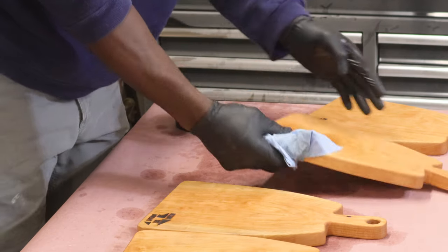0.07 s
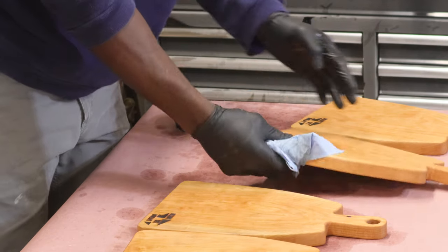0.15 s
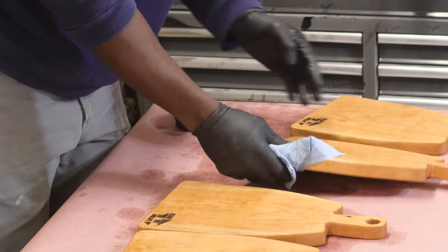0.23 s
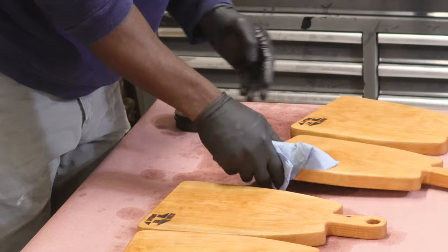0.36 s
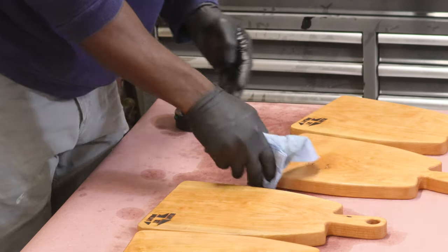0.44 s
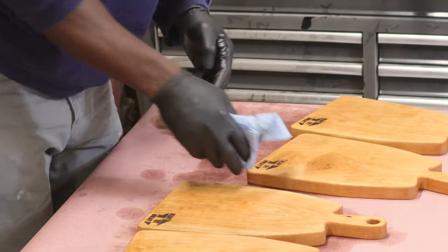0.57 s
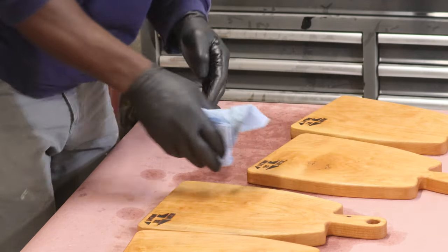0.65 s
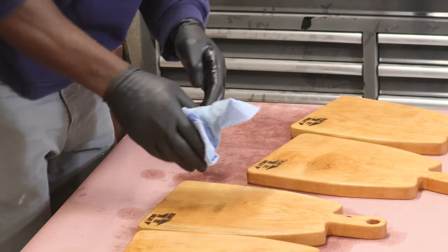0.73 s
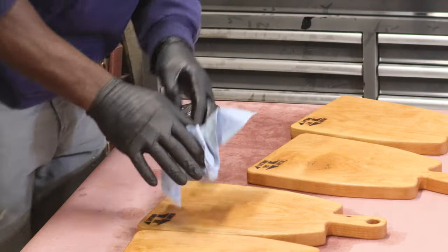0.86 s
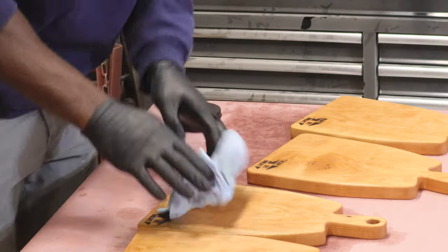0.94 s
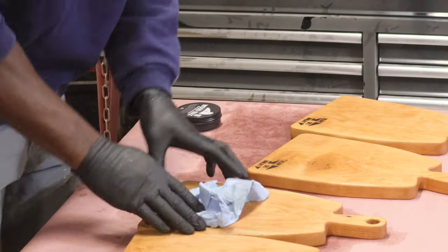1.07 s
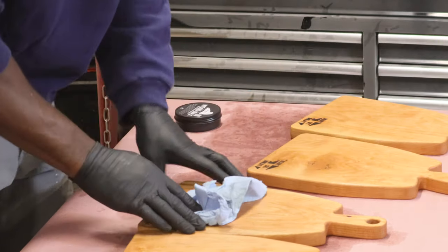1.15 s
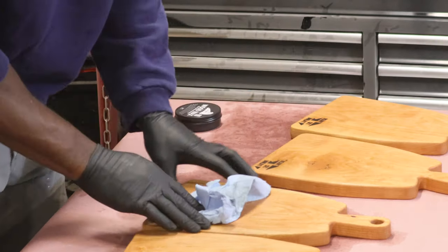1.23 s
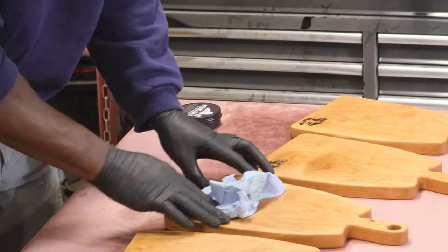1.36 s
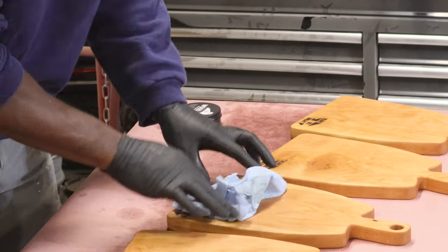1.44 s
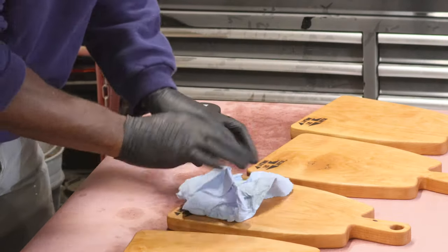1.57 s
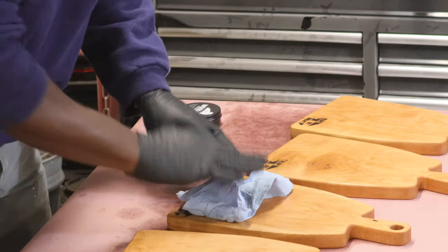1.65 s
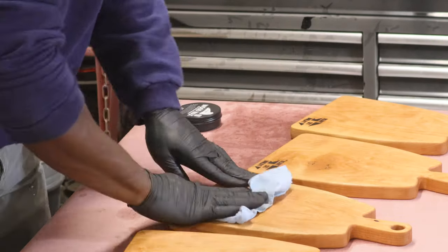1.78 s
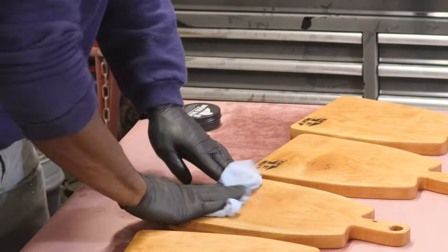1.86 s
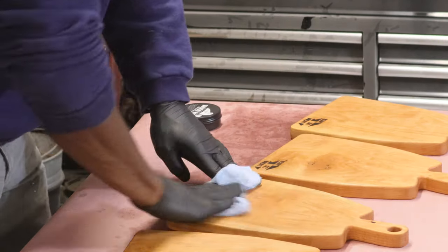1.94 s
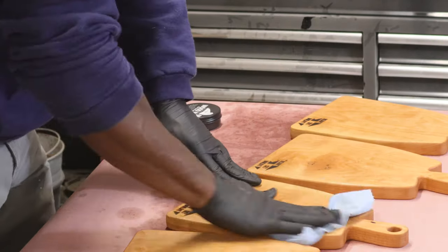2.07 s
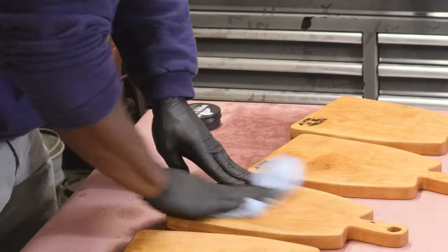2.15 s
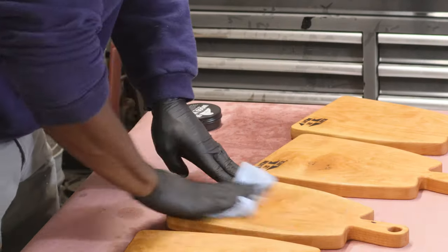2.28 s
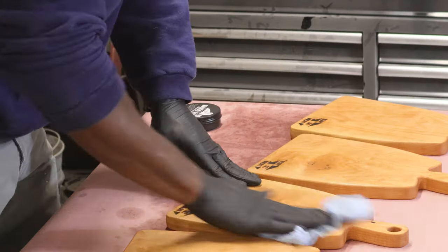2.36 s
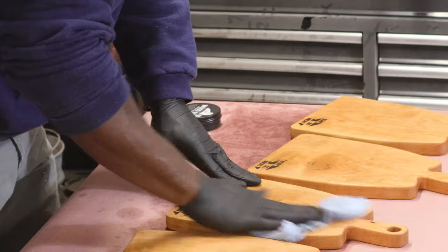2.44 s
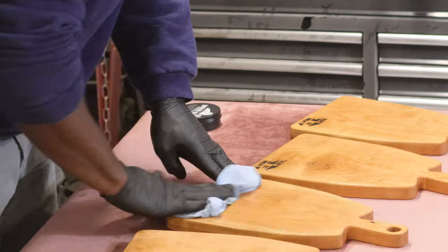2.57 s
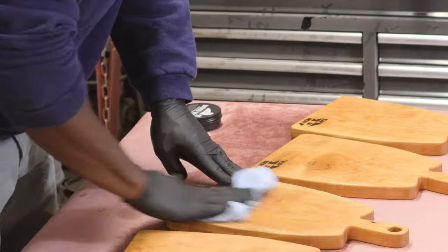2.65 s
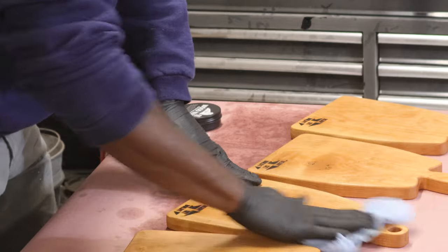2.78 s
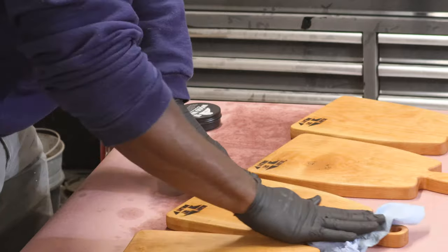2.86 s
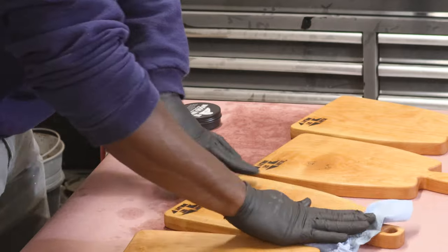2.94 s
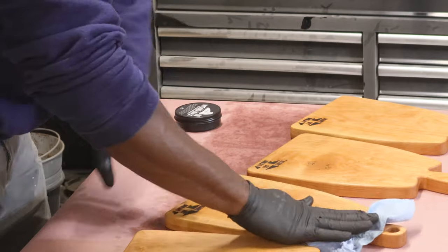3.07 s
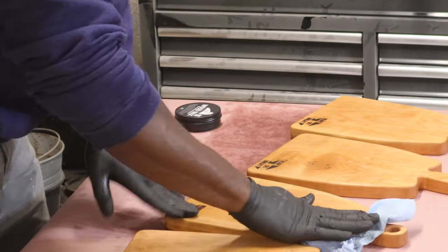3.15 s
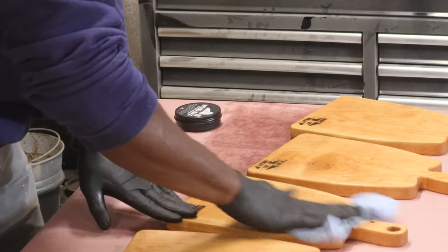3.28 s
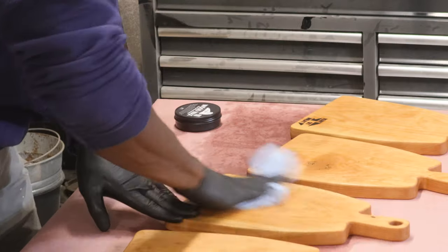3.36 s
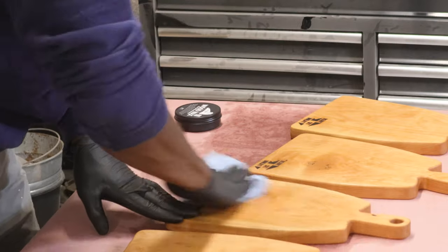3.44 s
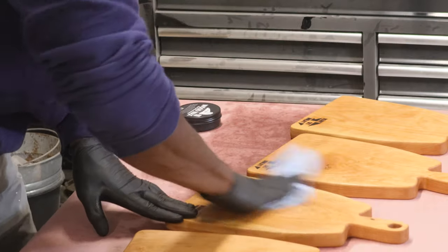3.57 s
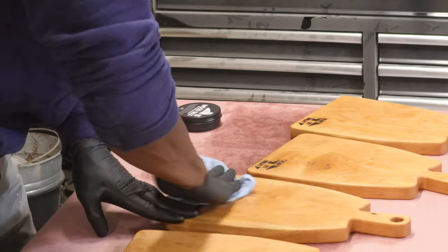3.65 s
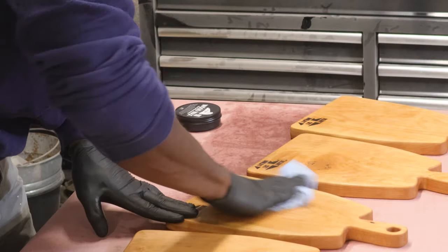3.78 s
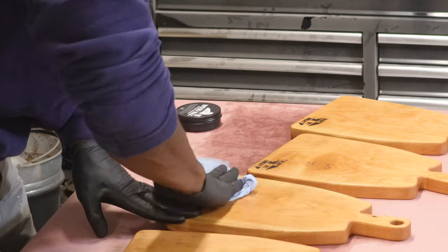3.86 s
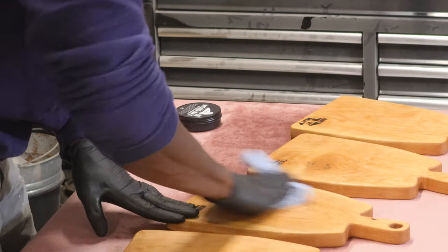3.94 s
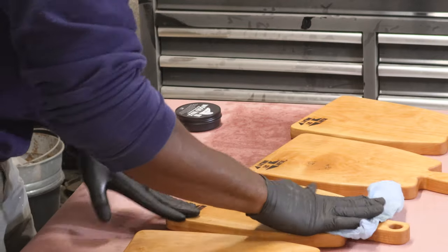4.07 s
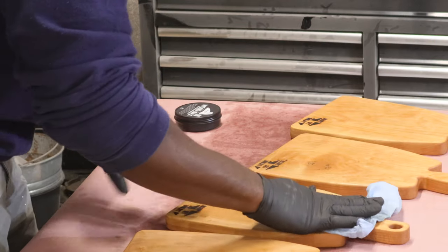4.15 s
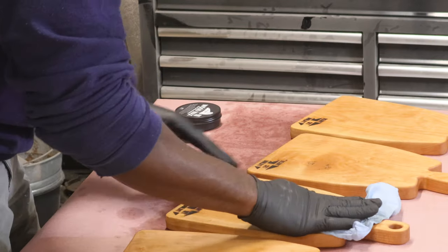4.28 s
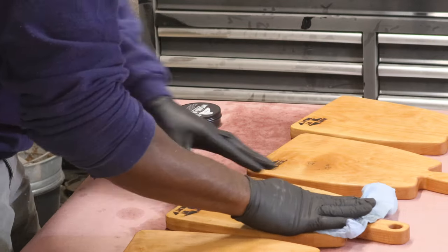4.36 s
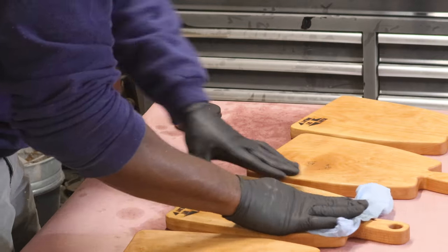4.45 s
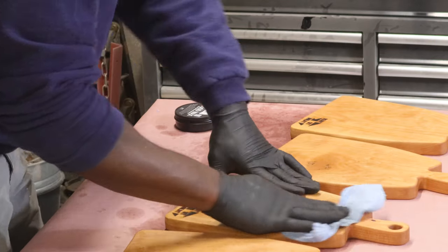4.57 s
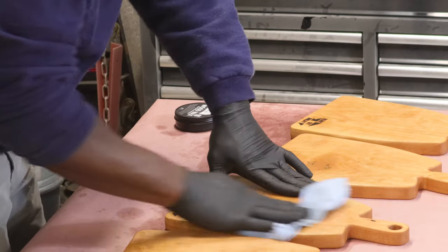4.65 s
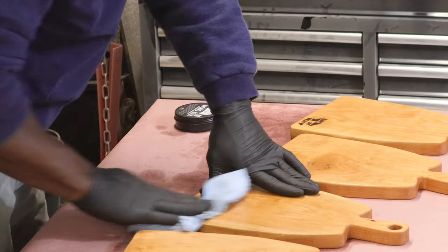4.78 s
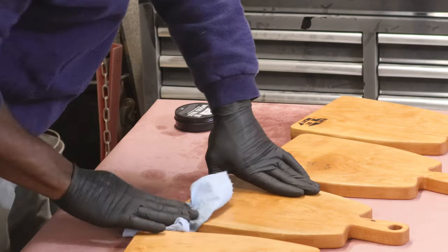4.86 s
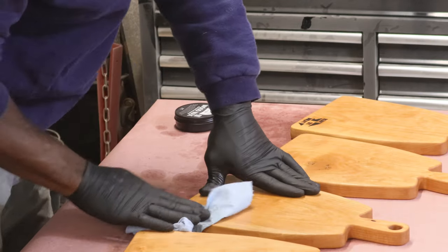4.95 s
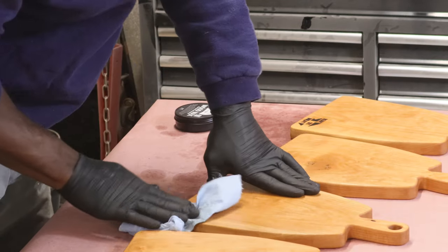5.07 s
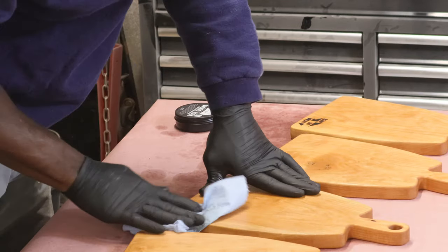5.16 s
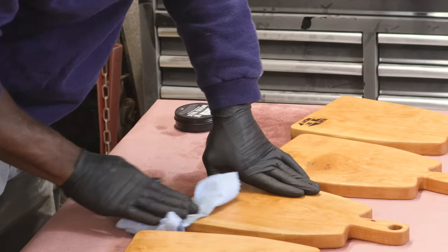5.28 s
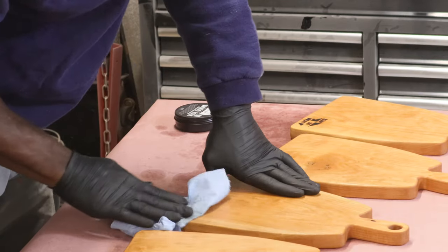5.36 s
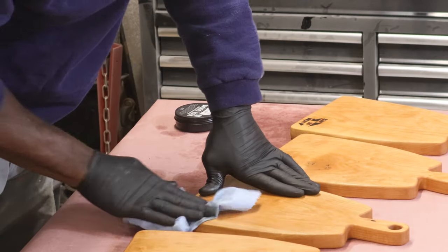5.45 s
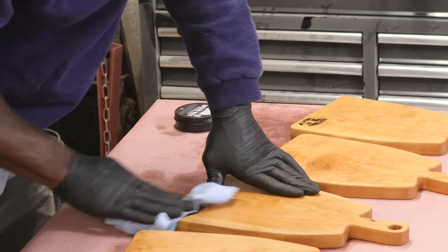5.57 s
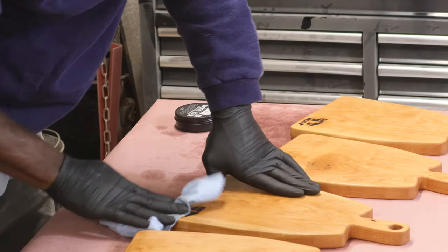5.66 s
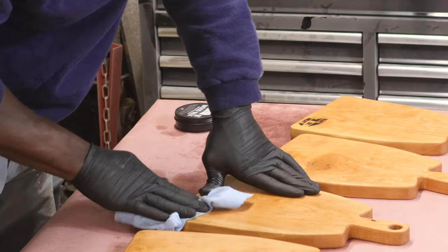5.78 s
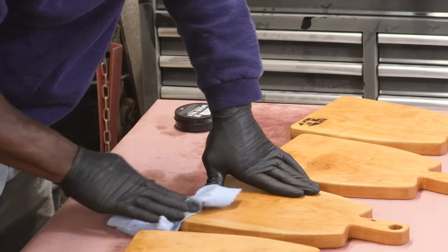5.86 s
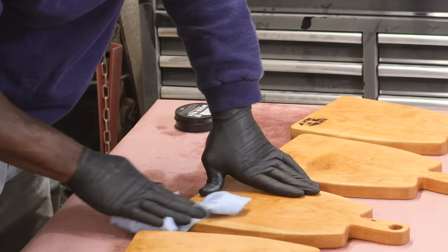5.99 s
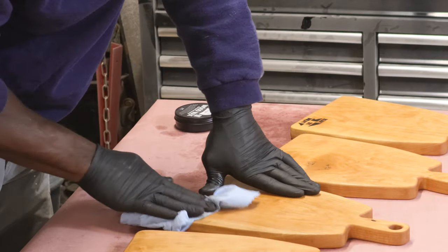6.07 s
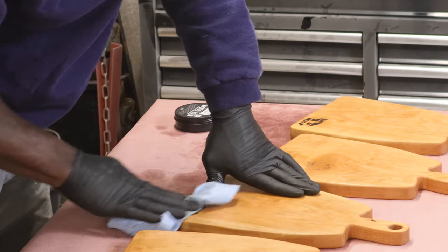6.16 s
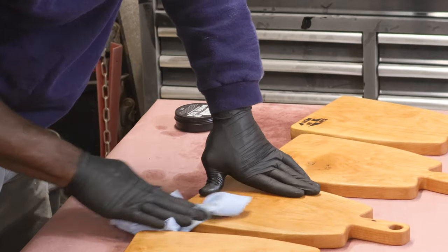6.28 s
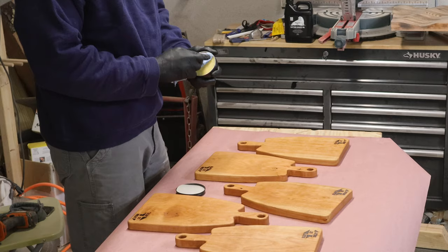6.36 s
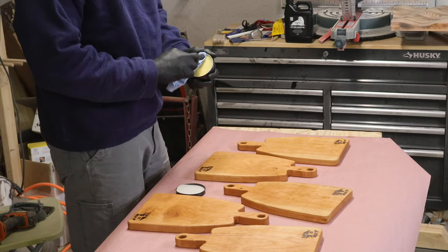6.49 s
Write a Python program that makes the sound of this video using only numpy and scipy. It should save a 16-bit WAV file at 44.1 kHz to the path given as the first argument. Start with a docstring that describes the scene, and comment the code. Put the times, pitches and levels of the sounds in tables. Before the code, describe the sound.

Heard close, in mono: a short wooden bump and drag, then a cluster of knocks ending in one hard clack about half a second in. Dry papery wiping follows, swishing back and forth over wood, later hollower and slower, with muffled bench thumps and one brief shuddering stroke. The wiping stops abruptly, leaving only faint room air.

```python
"""Wiping boards in a small workshop

A wooden serving board is lowered onto a workbench, bumps twice and drops flat with a knock.
Struck modes make the knock. A gloved hand then wipes oiled boards with a paper shop towel: dense tiny
fibre slips, filtered, make hiss, swish and wood rasp. Leaning pushes flex the bench, and one stroke judders.
Placed in mono, as if near: direct sound over a weaker diffuse echo, with a dull rush of air behind."""
import sys
import numpy as np
from scipy import signal
from scipy.fft import rfft, irfft
from scipy.io import wavfile
from scipy.ndimage import uniform_filter1d

SR = 44100
rng = np.random.default_rng(int(sys.argv[2]) if len(sys.argv) > 2 else 0)


def inscribe(sig):
    """Save sig as 16-bit PCM at rate SR to the path in sys.argv[1].

    A 1-D sig is mono; a 2-D sig holds one channel per row.
    Samples are clipped to [-1, 1] before scaling.
    """
    pcm = np.round(np.clip(np.atleast_2d(sig).T, -1, 1) * 32767)
    wavfile.write(sys.argv[1], SR, pcm.astype(np.int16))


N = 287532
T = np.arange(N) / SR  # time [s]

# strokes of the towel: (start [s], length [s], share of the length at which it is fastest [0-1],
# relative fibre hiss [dB], relative wood rasp [dB])
TOWEL_STROKES = [(0.111, 0.11, 0.52, -55, -39), (0.334, 0.23, 0.3, -53, -43),
                 (1.301, 0.23, 0.42, -40, -40.5), (1.78, 0.12, .4, -54.5, -44.5),
                 (1.882, 0.15, 0.17, -40.5, -45), (2.021, 0.14, 0.2, -43, -55),
                 (2.155, 0.17, 0.66, -41.5, -46.5), (2.325, 0.12, 0.3, -43.5, -49.5),
                 (2.438, .062, 0.64, -43, -46), (2.502, 0.21, 0.2, -43.5, -56),
                 (2.7, 0.27, 0.15, -44.5, -57), (2.981, 0.091, 0.47, -48.5, -40),
                 (3.13, 0.072, .4, -55, -45), (3.342, .185, 0.53, -42, -42.5),
                 (3.535, .225, 0.3, -41, -45.5), (3.764, 0.093, 0.35, -38, -43.5),
                 (3.85, 0.14, 0.5, -43, -45), (3.983, 0.22, 0, -46.5, -46), (4.53, 0.25, 0.5, -53.5, -51),
                 (4.74, 0.15, 0.2, -45, -55), (4.87, 0.19, 0.07, -47.5, -46.5),
                 (5.095, 0.084, .25, -53, -57), (5.215, 0.052, .35, -49, -46.5),
                 (5.318, .11, 0.2, -49, -47.5), (5.498, 0.24, 0.96, -45.5, -47),
                 (5.768, .11, 0.26, -47.5, -44), (5.953, .08, 0.6, -46, -43),
                 (6.057, 0.18, 0.5, -45.5, -47), (6.232, 0.14, 0.7, -45.5, -45)]
# steady weight of the hand, heard as the rasp between strokes: (time [s], relative level [dB])
HAND_REST = [(0, -53), (.5, -57), (.75, -67.5), (1.25, -54), (1.55, -51), (1.72, -60.5), (2.0, -49),
             (2.9, -49.5), (3.28, -55), (3.6, -41), (4.3, -56.5), (4.6, -48), (6.35, -49)]
# spectrum of the fine hiss of the fibres: (frequency [Hz], level [dB])
HISS_SPECTRUM = [(3000, -18), (5300, -0.5), (6500, -5), (7600, -1), (8600, -2.5), (10200, -8),
                 (11500, -8.5), (13000, -8.5), (15000, -13.5), (16000, -22.5)]
# spectrum of the coarser swish of the paper: (frequency [Hz], level [dB])
SWISH_SPECTRUM = [(700, -29.5), (1300, -3.5), (2000, -2.5), (2550, -3.5), (3100, 0), (3700, 0),
                  (4300, -1.5), (5300, -2), (6300, -7), (8000, -13), (11000, -25.5), (16000, -38.5)]
# spectrum of the rasp of the wood: (frequency [Hz], level [dB])
RASP_SPECTRUM = [(100, -40.5), (250, -7), (450, -0.5), (620, -0.5), (1000, 0.5), (1500, -2), (2300, -5.5),
                 (3500, -14), (6000, -33), (15000, -75.5)]
# faint gliding whistles: (start [s], length [s], first frequency [Hz], last frequency [Hz], level [dB])
WHISTLE_GLIDES = [(0.279, 0.246, 3760, 3640, -49), (.87, .44, 3260, 3000, -61),
                  (4.02, .37, 3370, 2980, -54), (4.473, 0.25, 3270, 3240, -57),
                  (5.12, 0.26, 3020, 3100, -54)]
# the board meets the bench: (time [s], peak before the band-pass [dB], brightness of the contact [Hz])
BOARD_KNOCKS = [(.112, -31.5, 600), (.184, -14.5, 285), (.209, -27, 820), (.234, -26, 1210),
                (.260, -28.5, 200), (.429, -21, 200), (.443, -15.5, 189), (.459, -13.5, 221),
                (.490, -31.5, 200), (.510, -9.5, 324), (.5295, -5.5, 1500), (.533, -1.5, 420),
                (.549, -11, 500), (.560, -19.5, 900), (.942, -30, 188)]
# modes of the board, damped by the bench: (frequency [Hz], level [dB], t60 [s])
BOARD_MODES = [(95, -7.5, 0.48), (158, -8, 0.09), (232.6, -7, 0.12), (348, 2.5, 0.063), (403.5, 5.5, 0.035),
               (463.6, -1, 0.09), (517, -2.5, 0.054), (644, -2, 0.018), (774, -3.5, 0.028),
               (900, -0.5, 0.033), (1120, 1, 0.026), (1344, -6, 0.021), (1595, -5.5, 0.015),
               (1946, -7.5, 0.024), (2310, -10.5, 0.019), (2700, -14.5, 0.018)]
# long ring of the bench and what lies on it: (frequency [Hz], level [dB], t60 [s])
BENCH_RING_MODES = [(99, -10, .35), (216.6, -11.5, 0.38), (301, 6, .3), (328, -3.5, 0.33),
                    (417, -22.5, 0.51), (472, 3.5, 0.5), (545, -6, 0.96), (645, -2, 0.25), (745, -11.5, .3),
                    (890, -5.5, 0.66), (1000, -9, .3), (1186, -7.5, .3)]
# the board's edge drags over the bench: (time [s], level before the band-pass [dB])
DRAG_LEVEL = [(.08, -66.5), (.16, -41), (.22, -30), (.27, -47), (.33, -38.5), (.41, -43.5), (.45, -27),
              (.52, -36.5), (.56, -72)]
# resonances of the dragged board: (frequency [Hz], width [Hz], level [dB])
DRAG_RESONANCES = [(164, 27, 11.5), (358, 51, -5.5), (910, 50, -6), (1750, 17, -4), (2057, 25, -9.5)]
# the hand leans on the bench: (time [s], peak before the band-pass [dB], brightness of the push [Hz])
HAND_THUDS = [(1.802, -25.5, 150), (1.835, -35, 200), (2.002, -35, 700), (3.253, -34.5, 190),
              (3.517, -38, 265), (3.63, -42, 400), (3.78, -34.5, 220), (4.547, -34, 187),
              (4.635, -31.5, 201), (4.882, -36, 45), (5.032, -31.5, 50.3), (5.104, -37, 65),
              (5.289, -32, 40.2), (5.543, -20, 74), (5.665, -36, 287), (5.912, -26, 30.4),
              (6.162, -30.5, 49.8), (6.286, -22.5, 62)]
# flexing modes of the bench top: (frequency [Hz], level [dB], t60 [s])
BENCH_FLEX_MODES = [(36, -2, 0.29), (63, 1.5, 0.1), (92.5, 2.5, 0.21), (119.6, -3.5, 0.24),
                    (163.7, -2, 0.2), (228, -5, 0.046), (329, -5.5, 0.11), (442, -28, 0.11)]
# hollow ring of the board when pushed at its edge: (frequency [Hz], level [dB], t60 [s])
EDGE_MODES = [(335.2, -2, 0.33)]
# the towel sticks and slips through one stroke:
# (start [s], length [s], share of the length at which it is strongest [0-1], level [dB])
JUDDER_STROKE = (6, 0.23, 0.4, -30.5)
# spectrum of the air of the workshop: (frequency [Hz], level [dB])
AIR_SPECTRUM = [(25, -7.5), (60, 1.5), (130, 2.5), (250, -3), (450, -4), (650, -7.5), (1100, -6),
                (2000, -10), (5000, -18.5), (9000, -24.5), (16000, -24.5)]
# the background sinks after the knock and falls away at the end: (time [s], level [dB])
AIR_COURSE = [(0, -46.5), (.5, -46), (.62, -58), (.85, -52), (1.2, -47), (4.3, -46.5), (6.35, -49.5),
              (6.38, -65), (6.52, -61.5)]

STOP_S = 6.36  # only the background is left after this
STROKE_ARCH = 0.43  # the level over a stroke follows a sine arch to this power; lower is flatter
LEAN_ARCH = 0.82  # the same for the hand's weight
LEAN_S = 0.035  # the hand's weight arrives this long before a stroke and leaves as long after
CREEP_DB = -6  # setting of the creeping towel's hiss between strokes, relative to that of its rasp
# the wiping moves to the board's hollow edge; level relative to the hand's weight
EDGE_FROM_S, EDGE_REACH_S, EDGE_DB = 4.8, .12, -3.5
JUDDER_PER_S, JUDDER_SCATTER = 123, 0.0803  # mean jerks a second and their relative spread
JUDDER_ARCH = 0.99  # power of the sine arch that the judder swells with
TAP_DB, TAP_HZ = -14, 330  # the board taps the bench under every push: level relative to it, brightness
EDGE_TAP_DB = -16.5  # hollow edge ring relative to the push
TOP_HZ = 15800  # upper limit of the recorder


def towel():
    """Speed makes fibres hiss, weight makes wood rasp, both feed the swish; the embossed paper's grip flutters."""
    speed_db, weight_db = hand()
    swish_db = 0.56 * speed_db + 0.33 * weight_db - 3.0
    hiss = unit(colour(slips(per_s=22000, spread_db=0.0), HISS_SPECTRUM)) * undb(speed_db + 1.5)
    swish = unit(colour(slips(per_s=16000, spread_db=0.5), SWISH_SPECTRUM)) * undb(swish_db)
    rasp = unit(colour(slips(per_s=7000, spread_db=2.0), RASP_SPECTRUM)) * undb(weight_db - 1.8)
    # at the edge the board's own resonances come through
    scuff = rng.standard_normal(N)
    at_edge = np.clip((T - EDGE_FROM_S) / EDGE_REACH_S, 0, 1)
    edge_body = unit(band(scuff, 855, 1290)) + undb(-8.0) * unit(resonate(scuff, 333, 18.0))
    hollow = edge_body * undb(weight_db + EDGE_DB) * at_edge
    grip_db = .7 * walk(70) + 0.44 * walk(22.1)
    return (hiss + swish + rasp + hollow) * undb(grip_db)


def hand():
    """Speed and weight of the hand in dB: each stroke rises out of a slow creep and sinks back into it."""
    rest_db, = curves(HAND_REST)
    creep_db = rest_db + CREEP_DB
    speeds, weights = [], []
    for start, length, peak, hiss_db, rasp_db in TOWEL_STROKES:
        moving = arch(start, length, peak) ** STROKE_ARCH
        leaning = arch(start - LEAN_S, length + 2 * LEAN_S, peak) ** LEAN_ARCH
        speeds.append(creep_db + (hiss_db - creep_db) * moving)
        weights.append(rest_db + (rasp_db - rest_db) * leaning)
    return np.max(speeds, axis=0), np.max(weights, axis=0)


def whistle():
    """Faint, narrow bands of noise that swell, glide and fade: two slow random signals on a gliding carrier."""
    out = np.zeros(N)
    waver = 1 + .007 * walk(60)
    in_phase, across = walk(280), walk(200)
    for start, length, first_hz, last_hz, db in WHISTLE_GLIDES:
        glide_hz = np.interp(T, [start, start + length], [first_hz, last_hz]) * waver
        phase = 2 * np.pi * np.cumsum(glide_hz) / SR
        tone = in_phase * np.cos(phase) + across * np.sin(phase)
        out += tone * undb(db) * arch(start, length)
    return out


def board():
    """The board drags and lands in several blows: a wooden clack with a crack on top, while the bench rings on."""
    t = T[:SR // 2]
    crack = unit(band(rng.standard_normal(len(t)), 1300, 8700, order=1)) * fade(t, 0.049)
    # countless weak modes fill the gaps between the strong ones
    clatter = unit(band(rng.standard_normal(len(t)), 450, 1930, order=3)) * fade(t, 0.081)
    body = ring(BOARD_MODES) + undb(-26.5) * ring(BENCH_RING_MODES)
    blows = strike(BOARD_KNOCKS, body + undb(-8) * clatter + undb(-9.5) * crack)
    drag_db, = curves(DRAG_LEVEL)
    catches = slips(per_s=1200, spread_db=0.7)
    drag = unit(sum(undb(db) * resonate(catches, hz, width) for hz, width, db in DRAG_RESONANCES))
    dragging = (T > DRAG_LEVEL[0][0]) & (T < DRAG_LEVEL[-1][0])
    return band(blows + drag * undb(drag_db) * dragging, 63, 8300, order=1)


def bench():
    """Soft pushes on the board flex the bench top; the sticking towel shakes it with an uneven train of jerks."""
    flex = ring(BENCH_FLEX_MODES)
    edge = ring(EDGE_MODES)
    start, length, peak, db = JUDDER_STROKE
    cycles = np.cumsum(JUDDER_PER_S * (1 + JUDDER_SCATTER * walk(82.3))) / SR
    # one jerk at each completed cycle
    jerks = np.diff(np.floor(cycles), prepend=0) * undb(1.6 * walk(120))
    grip = unit(jerks) + 0.76 * slips(per_s=1200, spread_db=2.0)
    shaken = signal.fftconvolve(grip, flex + undb(-3) * edge)[:N]
    shake = steady(band(shaken, 49, 310, order=3), window_s=.035)
    judder = shake * undb(db) * arch(start, length, peak) ** JUDDER_ARCH
    taps = [(s, push_db + TAP_DB, TAP_HZ) for s, push_db, hz in HAND_THUDS]
    thuds = strike(HAND_THUDS, flex) + strike(taps, flex + undb(-13) * ring(BOARD_MODES))
    edge_taps = [(s, push_db + EDGE_TAP_DB, TAP_HZ) for s, push_db, hz in HAND_THUDS if s > EDGE_FROM_S]
    hollow = strike(edge_taps, edge)
    return band(thuds + hollow, 24, 850) + judder


def workshop(x, wet_db, t60_low, t60_mid, t60_high):
    """Diffuse echo of the walls and steel cabinets, as decaying noise in three bands; the treble dies first."""
    t = T[:SR * 3 // 4]
    low, mid, high = rng.standard_normal((3, len(t)))
    tail = undb(-1.5) * band(low, 92, 560) * fade(t, t60_low)
    tail += band(mid, 560, 2600) * fade(t, t60_mid)
    tail += undb(0.5) * band(high, 2530, 10000) * fade(t, t60_high)
    # the echo sets in 4 ms after the direct sound
    tail *= np.clip((t - .004) / 0.0027, 0, 1)
    return undb(wet_db) * signal.fftconvolve(x, tail / np.sqrt(np.sum(tail ** 2)))[:N]


def air():
    """Dull background rush of filtered noise with a slight waver, over a faint steady hiss."""
    db, = curves(AIR_COURSE)
    rush = unit(colour(rng.standard_normal(N), AIR_SPECTRUM)) * undb(db + walk(6.6))
    return rush + undb(-68.5) * unit(band(rng.standard_normal(N), 504, 8000, order=1))


def slips(per_s, spread_db):
    """Tiny releases at random moments, as of paper fibres; a wider spread makes a few much larger."""
    happens = rng.random(N) < per_s / SR
    size = undb(spread_db * np.minimum(rng.exponential(size=N), 2 * np.pi))
    return unit(happens * size * rng.standard_normal(N))


def strike(events, response):
    """Blows on a body; a softer contact pushes longer and rings it lower."""
    out = np.zeros(N + len(response))
    for s, db, hz in events:
        age = 2 * np.pi * hz * T[:SR // 10]
        # the contact presses, rebounds and settles
        push = age * (6 - 6 * age + age ** 2) * np.exp(-age)
        blow = signal.fftconvolve(response, push)[:len(response)]
        start = int(s * SR)
        out[start:start + len(blow)] += undb(db) * blow / np.abs(blow).max()
    return out[:N]


def ring(modes):
    """Half a second of damped modes after a tap; neighbouring modes start in opposite directions."""
    t = T[:SR // 2]
    out = np.zeros(len(t))
    for k, (hz, db, t60) in enumerate(modes):
        out += (-1) ** k * undb(db) * np.cos(2 * np.pi * hz * t) * fade(t, t60)
    return out


def fade(t, t60):
    """Exponential decay by 60 dB in t60."""
    return np.exp(-np.log(1000) * t / t60)


def arch(start, length, peak=.5):
    """Rises from 0 at the start to 1 at the share peak (held to .05-.95) of the length and returns to 0."""
    top = start + length * np.clip(peak, .05, .95)
    inside = (T > start) & (T < start + length)
    out = np.zeros(N)
    out[inside] = np.sin(np.pi / 2 * np.interp(T[inside], [start, top, start + length], [0, 1, 0]))
    return out


def walk(rate):
    """Smooth chance with spread 1, changing about rate times a second."""
    size = int(SR / rate)
    return unit(uniform_filter1d(uniform_filter1d(rng.standard_normal(N), size), size))


def curves(table):
    """Each column of a table, joined by straight lines in time."""
    s, *columns = np.transpose(table)
    return [np.interp(T, s, c) for c in columns]


def colour(x, points):
    """Filter by a spectrum of (frequency [Hz], level [dB]) points."""
    hz, db = np.transpose(points)
    f = np.fft.rfftfreq(len(x), 1 / SR)
    gain = undb(np.interp(np.log(f + 1), np.log(hz), db))
    return irfft(rfft(x) * gain, len(x))


def resonate(x, hz, width_hz):
    """One resonance, gain 1 at its centre."""
    return signal.lfilter(*signal.iirpeak(hz, hz / width_hz, fs=SR), x)


def band(x, lo_hz, hi_hz, order=2):
    """Band-pass."""
    sos = signal.butter(order, [lo_hz, min(hi_hz, SR / 2 - 1)], "band", fs=SR, output="sos")
    return signal.sosfilt(sos, x)


def steady(x, window_s):
    """Even out the level by dividing by the rms over a short moving window."""
    return x / np.sqrt(np.abs(uniform_filter1d(x ** 2, int(window_s * SR))) + 1e-18)


def unit(x):
    """Scale to rms 1."""
    return x / np.sqrt(np.mean(x ** 2))


def undb(db):
    """Decibels to gain."""
    return 10 ** (np.asarray(db) / 20)


def scene():
    """Sources and their echo, alike in both channels; at the end only the background is left."""
    knocks, thuds, rub = board(), bench(), towel()
    to_room = knocks + undb(-1.5) * thuds + undb(-5.5) * rub
    echo = workshop(to_room, wet_db=-8.5, t60_low=0.44, t60_mid=0.44, t60_high=0.38)
    working = np.clip((STOP_S - T) / 0.0049, 0, 1)
    mono = (knocks + thuds + rub + whistle() + echo) * working + air()
    return np.array([mono, mono])


def record(dry):
    """The recorder clips peaks at full scale, then cuts the top with a steep low-pass."""
    top_cut = signal.ellip(10, .2, 80, TOP_HZ, fs=SR, output="sos")
    return signal.sosfilt(top_cut, np.clip(dry, -1, 1))


dry = scene()
out = record(dry)
inscribe(out)
```